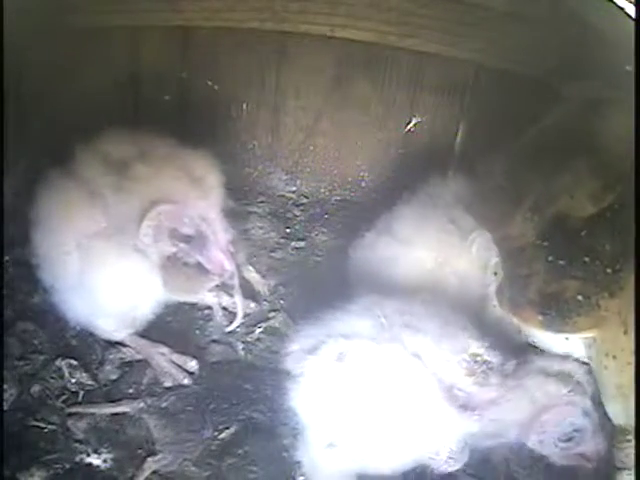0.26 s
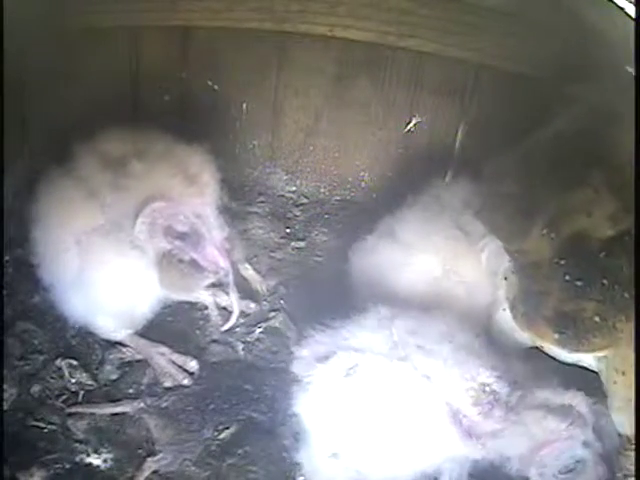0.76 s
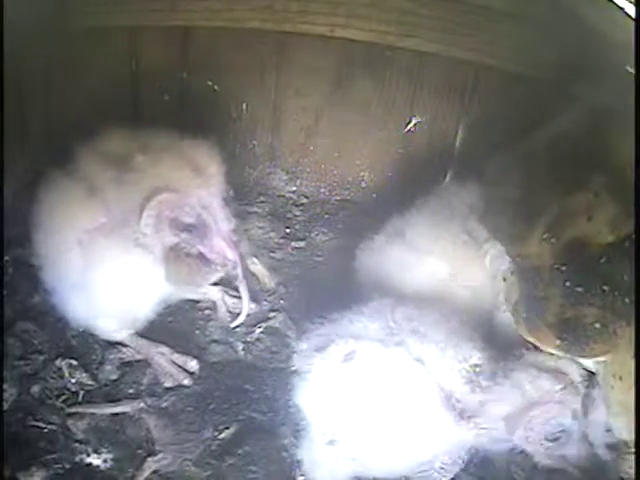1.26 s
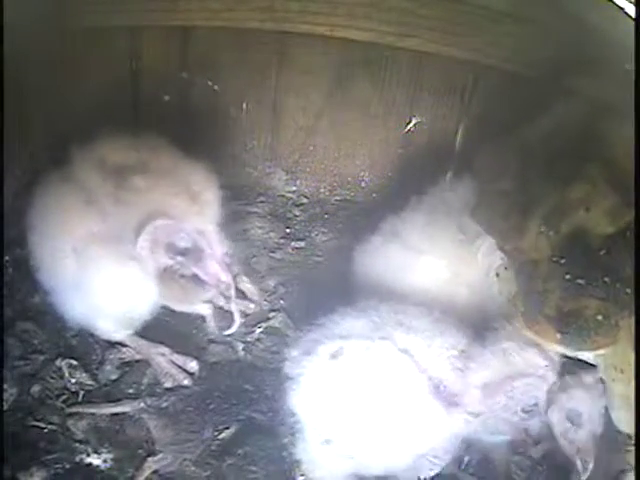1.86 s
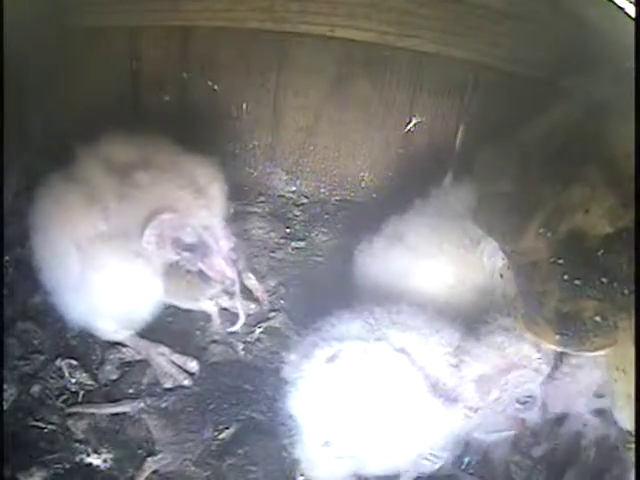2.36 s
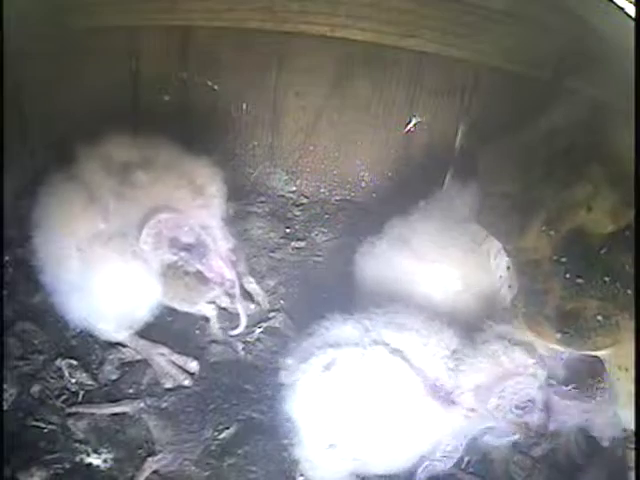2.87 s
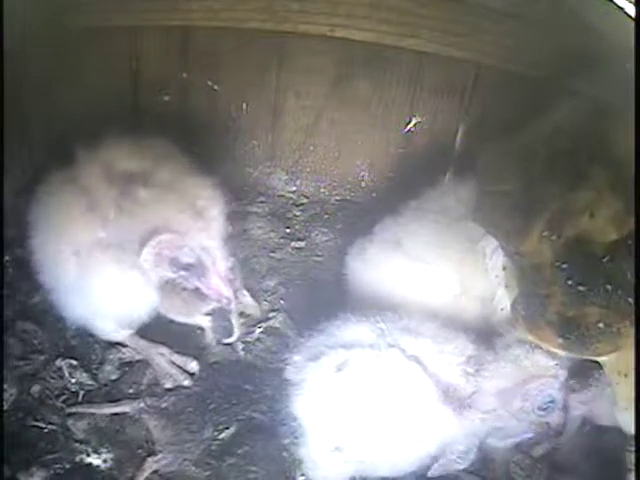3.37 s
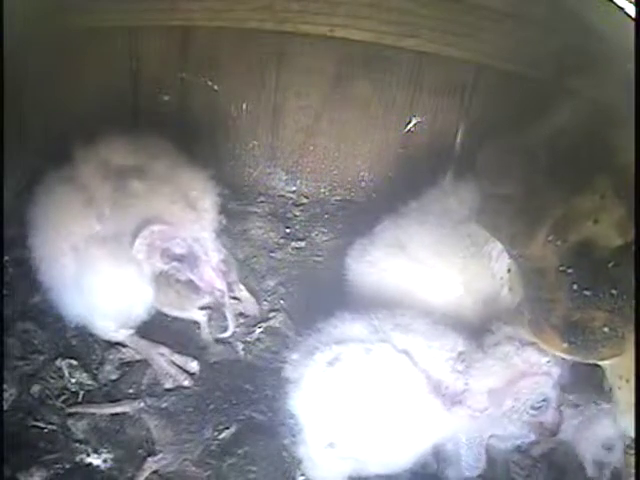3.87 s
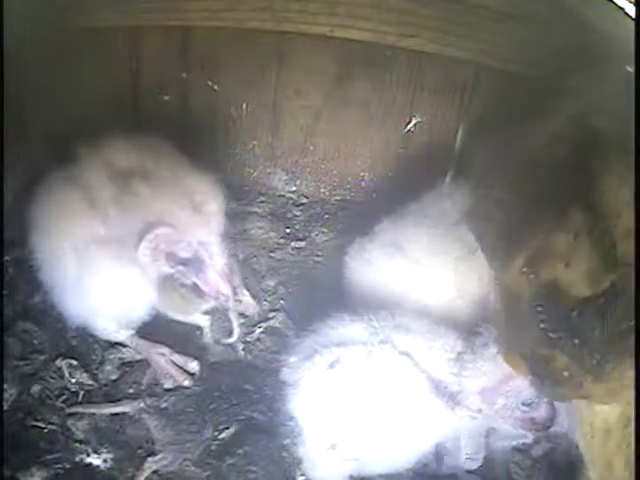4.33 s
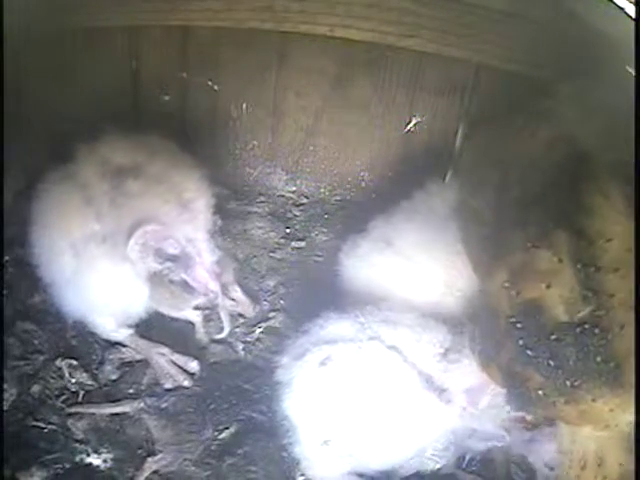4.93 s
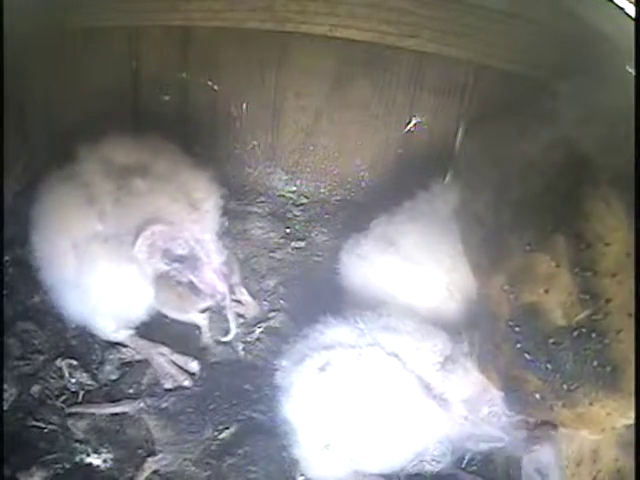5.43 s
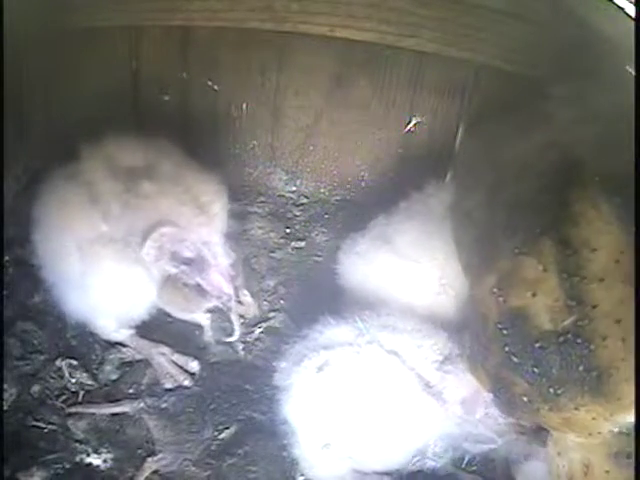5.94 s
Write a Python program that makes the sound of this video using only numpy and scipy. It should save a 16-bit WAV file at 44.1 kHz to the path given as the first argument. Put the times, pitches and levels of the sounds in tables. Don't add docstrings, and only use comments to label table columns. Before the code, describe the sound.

Close and dry, a barn owl chick repeats hoarse snore-like hisses that swell, then choke off abruptly with a short chirp. Little clicks and thin squeaks come between them. Soft footsteps and one firm thud sound on wood before the halfway point. Beneath lie mains-like buzzing, line hiss, a faint wavering distant machine and dull traffic. The gritty sound sits on the left, the right almost silent; the final hiss is cut short.

```python
import sys
import numpy as np
from scipy import signal
from scipy.fft import rfft, irfft, next_fast_len
from scipy.io import wavfile
from scipy.ndimage import uniform_filter1d, map_coordinates

SR = 44100
rng = np.random.default_rng(int(sys.argv[2]) if len(sys.argv) > 2 else 0)


def digitize_waveform(pressure):
    field = np.atleast_2d(pressure).T
    bounded = np.clip(field, -1, 1)
    quanta = np.round(bounded * 32767).astype(np.int16)
    wavfile.write(sys.argv[1], SR, quanta)


def volts_from_decibels(level):
    exponent = np.asarray(level, float) / 20
    return 10 ** exponent


N = 273420
T = np.arange(N) / SR
FIELD_HZ = 59.94

# (centre [Hz], width [Hz], level [dB])
TRACT_MODES = [(1360, 76, -7), (1960, 220, -6.5), (2530, 160, -10.5), (4080, 78, -10), (4396, 200, -3),
               (4562, 140, 2.5), (5000, 66, -13.5), (5970, 100, -12), (6615, 140, -6), (7124, 77, -6),
               (8130, 160, -9.5), (8980, 160, -15.5), (9950, 190, -8), (12000, 110, -25)]


def along(points, hz):
    f, v = np.transpose(points)
    return np.interp(np.log(hz + 1), np.log(f + 1), v)


def unit(x):
    return x / np.sqrt(np.mean(x ** 2, axis=-1, keepdims=True) + 1e-20)


def wobble(rate, n):
    knots = rng.standard_normal(int(n * rate / SR) + 4)
    return map_coordinates(knots, [np.arange(n) * rate / SR])


def filtered(x, response):
    m = next_fast_len(x.shape[-1] + 8192)
    spectrum = rfft(x, m) * response(np.fft.rfftfreq(m, 1 / SR))
    return irfft(spectrum, m)[..., :x.shape[-1]]


def noise(spectrum, n):
    return unit(filtered(rng.standard_normal(n), lambda hz: volts_from_decibels(along(spectrum, hz))))


def add(track, s, x):
    part = track[round(s * SR):][:len(x)]
    part += x[:len(part)]


def resonances(modes, f, home=None):
    total = 0
    for (centre, width, db), home_mode in zip(modes, home or modes):
        sign = (-1) ** (home_mode[0] // 2200)
        ring = 1j * f * width
        total = total + sign * volts_from_decibels(db) * ring / (centre * centre - f * f + ring)
    return total


def valleys(dips, f):
    return volts_from_decibels(sum(db * np.exp(-((f - c) / w) ** 2) for c, w, db in dips))


def owlet():
    # (time [s], level [dB])
    efforts = [
        [(0.297, -59), (0.305, -57), (0.351, -36.5), (0.467, -24), (0.699, -24), (0.731, -36.5), (0.765, -57)],
        [(1.126, -57.5), (1.164, -42.5), (1.248, -32.5), (1.418, -23), (1.496, -21.5), (1.55, -36),
         (1.565, -72)],
        [(1.948, -55.5), (1.996, -38), (2.186, -23), (2.326, -24.5), (2.374, -37), (2.394, -48), (2.4, -74)],
        [(2.722, -39), (2.734, -43), (2.958, -21.5), (3.09, -20.5), (3.162, -30), (3.212, -44.5),
         (3.225, -57.5)],
        [(3.578, -67.5), (3.652, -35.5), (3.76, -30.5), (3.816, -28), (3.83, -25.5), (3.914, -27), (3.985, -66)],
        [(4.44, -100), (4.47, -71), (4.48, -60), (4.71, -26), (4.832, -31), (4.88, -46), (4.89, -89)],
        [(5.242, -80.5), (5.288, -50.5), (5.354, -40), (5.434, -31), (5.6, -28.5), (5.642, -50.5), (5.65, -95)],
        [(6.05, -50), (6.054, -57.5), (6.084, -47), (6.192, -37.5), (6.2, -38)],
    ]
    # (chest [dB], throat [dB], bill [dB], air [dB])
    region_levels = [(-14, -10, -13, -10), (-14.5, -7.5, -9, -10.5), (-12.5, -5, -9.5, -9),
                     (-15, -16.5, -6.5, -21.5), (-12, -8, -10, -8), (-10, -6, -8, -10.5),
                     (-7.5, -3.5, 0, -4), (-1, -1.5, 2.5, -6)]
    throat_growth = [0.95, 1, 0.78, 0.57, 0.75, 0.55, 0.38, 0.85]
    shut_times = [0.023, 0.036, 0.05, 0.027, 0.028, 0.037, 0.033, .03]
    # (centre [Hz], width [Hz], level [dB])
    postures = [
        [(1324, 61, -14.5), (3350, 46, -3), (4020, 58, -8.5), (6270, 79, -12), (7920, 170, -9)],
        [(1090, 140, -8), (2650, 394, -23.5), (3130, 22, -4), (6790, 240, -12), (9560, 180, -8.5)],
        [(1810, 160, 3.5), (2460, 200, 3), (2935, 39, -2.5), (3950, 100, -10.5), (4740, 296, -8.5)],
        [(1650, 200, 1.5), (3762, 350, -3.5), (4614, 100, 7), (5220, 34, -29), (6500, 33, -5)],
        [(1090, 140, -11), (2520, 55, -2.5), (4860, 55, -3.5), (5160, 130, -1), (6860, 320, -5.5)],
        [(657, 94, -4.5), (1800, 280, -10), (2550, 310, -9), (6500, 140, -12), (10240, 180, -12)],
        [(1320, 46, -16), (2340, 280, -5.5), (4310, 860, -3.5), (6000, 95, -15), (6500, 100, 1)],
        [(1420, 73, -6), (2730, 23, -4), (6430, 120, 3.5), (7000, 68, -8), (10100, 460, 4)],
    ]
    # (centre [Hz],
    # width [Hz], gain [dB])
    echo_valleys = [
        [(3220, 260, -2.5), (5500, 100, -6), (8600, 200, -9)],
        [(3200, 400, -3), (6220, 120, -8), (8650, 370, -13)],
        [(3930, 130, 6), (5740, 150, 6), (10810, 250, -14)],
        [(3175, 300, -13.5), (5540, 450, -8.5), (7430, 340, -12.5)],
        [(5540, 430, -9), (7660, 200, 4.5), (9000, 160, 4)],
        [(3280, 300, -8), (5000, 120, -5), (7670, 480, -6.5)],
        [(3310, 340, -10), (5300, 400, -8), (5880, 130, -11)],
        [(3590, 500, -5.5), (7700, 250, -12), (8800, 200, -1)],
    ]
    # (centre [Hz], width [Hz], start level [dB], end level [dB])
    head_turns = [
        [(2800, 500, -3, 5.5), (4200, 150, -1.5, -5.5), (5250, 150, -3.5, 6), (6500, 300, -6, 2),
         (9950, 200, -9, -5), (5000, 200, 5, 5)],
        [(4150, 170, -6, -1), (5120, 290, 10.5, -7.5), (5830, 230, 6, -9.5), (9200, 200, 1, 2.5),
         (11000, 500, -5, 3), (4550, 200, -3, 5), (6700, 400, 3, -5), (2100, 400, -5, 3)],
        [(3300, 200, -0.5, -1), (4200, 120, 4, 4), (4520, 120, -5, -3), (5620, 430, 5, -4), (7300, 430, 0.5, 4),
         (10280, 400, 3.5, 4.5)],
        [(3200, 200, -3, -9), (5600, 250, 5, 3.5), (7600, 250, -1.5, 7), (9950, 200, -8, -7),
         (8200, 400, -2, -1), (11500, 500, 6.5, -2)],
        [(1500, 180, 0, -10), (2600, 300, -8, 5), (4230, 250, 5, -4), (5640, 230, 8, -10), (8800, 270, -9, -6),
         (10800, 400, -6, -1)],
        [(4300, 180, -3, 6), (3000, 400, 2, 5.5), (5300, 300, 5, 5), (5700, 150, 8, 6), (7200, 210, -15, -1),
         (10600, 400, 0, -3)],
        [(1600, 120, -9, -6), (4150, 250, 3, 6), (3300, 330, -3, 3), (5600, 450, -1, 4.5), (6650, 250, 4, 6),
         (9700, 350, -9, -1)],
        [(1400, 170, 0, -2), (3200, 500, -1, 3), (5400, 300, 11, 5), (7150, 200, 2, -9), (8600, 300, 1, -4),
         (4800, 200, 5, 3)],
    ]
    # (peep start [s], peep end [s], first pitch [Hz], peep level [dB], narrowing level [dB])
    endings = [(0.748, 0.768, 2050, -31.5, -31.5), (1.554, 1.566, 1800, -36, -31),
               (2.379, 2.403, 2000, -31.5, -37), (3.207, 3.223, 1860, -31, -38.5),
               (3.964, 3.99, 2036, -31, -29.5), (4.87, 4.89, 2007, -31, -32.5),
               (5.637, 5.646, 2105, -25.5, -30)]
    peep_overtones = [-26, -25, -20, -45, -30, -45, -45]
    # (start [s], end [s], level [dB])
    leaks = [
        (.268, 0.297, -65),
        (4.436, 4.471, -53),
        (6.015, 6.054, -53.5),
    ]
    # (time [s], length [s], depth [dB])
    catches = [(0.7415, .002, -18), (0.76, 0.007, -15), (1.53, .0015, -15), (1.5425, 0.002, -18),
               (1.558, 0.005, -24), (2.378, 0.0018, -19), (2.396, .007, -12), (4.835, .002, -15),
               (4.859, 0.0028, -26), (5.631, 0.0015, -15), (5.6365, .001, -8), (6.058, 0.0032, -5)]
    # (start [s], end [s], first pitch [Hz], level [dB], overtones [dB])
    whistles = [(0.287, 0.298, 4800, -47, -21), (1.114, 1.127, 4750, -53, -22),
                (1.933, 1.947, 5150, -54, -12), (3.564, 3.578, 4520, -46.5, -33),
                (5.223, 5.244, 5170, -57, -12), (6.04, 6.049, 4840, -42, -12)]
    # (start [s], end [s], pitch [Hz], level [dB], overtones [dB])
    squeaks = [(0.269, 0.276, 5400, -60, -20), (0.287, .292, 7000, -58, -30),
               (4.436, 4.444, 5000, -58.5, -15), (4.442, 4.456, 6500, -47, -30),
               (4.458, 4.467, 6850, -47, -30), (4.462, 4.474, 4500, -38, -16),
               (4.839, 4.851, 4250, -37, -40), (6.016, 6.021, 4950, -62, -6)]
    # (time [s], peak level [dB], pitch [Hz], crack level [dB])
    pops = [(0.2969, -40.5, 1360, -5.5), (1.061, -49, 1500, -12), (1.1286, -40, 1330, -11.5),
            (1.774, -44, 1120, -28), (1.949, -34.5, 1800, -10), (2.7226, -32.5, 2100, -5),
            (3.4251, -35.5, 2040, -13), (3.579, -37.5, 2100, -7), (4.467, -42, 1420, -3),
            (5.242, -35, 2050, -22), (6.047, -39, 1960, -9)]
    narrow_s, whistle_end_hz, pop_t60_s = 0.085, 4180, 0.01

    breath, notes = np.zeros(N), np.zeros(N)
    for rows, regions_db, grows, shut_s, extra, dips, turn in zip(
            efforts, region_levels, throat_growth, shut_times, postures, echo_valleys, head_turns):
        voice = hiss(rows, regions_db, grows, shut_s, TRACT_MODES + extra, dips, turn,
                     spill_db=-5.5, flutter_db=0.8)
        add(breath, rows[0][0], voice)
    for (start, end, hz, db, narrow_db), over_db in zip(endings, peep_overtones):
        add(breath, start - narrow_s, closing(narrow_s, 2500, 1.03 * hz, narrow_db, width_hz=380))
        add(notes, start, peep(end - start, hz, 0.82 * hz, db, over_db))
    for start, end, db in leaks:
        add(breath, start, leak(end - start, db))
    breath *= volts_from_decibels(sum(db * np.exp(-((T - s) / length) ** 2) for s, length, db in catches))

    for start, end, hz, db, over_db in whistles:
        add(notes, start, peep(end - start, hz, whistle_end_hz, db, over_db))
    for start, end, hz, db, over_db in squeaks:
        add(notes, start, peep(end - start, hz, hz, db, over_db))
    t = T[:SR // 20]
    for s, db, hz, crack_db in pops:
        crack = volts_from_decibels(crack_db) * np.diff(rng.standard_normal(len(t) + 1))
        decay = volts_from_decibels(db + 4.5 - 60 * t / pop_t60_s)
        add(notes, s, decay * (np.sin(2 * np.pi * hz * t) + 0.26 * crack))
    return breath + notes


def hiss(rows, regions_db, throat_grows, shut_s, modes, dips, turn, spill_db, flutter_db):
    # (frequency [Hz], level [dB])
    spill_spectrum = [(180, -64), (300, -11), (915, -7), (1060, -4), (1510, -9.5), (1900, -8), (3640, -9.5),
                      (4520, -18), (5610, -46), (6850, -12.5), (10000, -18), (13300, -15.5), (16000, -33.5)]
    # (centre [Hz], width [Hz], level [dB])
    wall_valleys = [(341, 124, -10.5), (882, 89, -8.5), (1585, 89, -3.5), (2180, 76, -5.5),
                    (4870, 110, -0.5), (4800, 77, 4.5)]
    borders_hz = [1650, 3300, 5500, 7600]
    # chest, bill, air [dB/dB]
    growth = (0.29, 0.52, 0.63)
    # chest, throat, bill, air [dB]
    shut_levels = (-0.5, 2, -24, -26.5)
    # time [s], length [s], depth [dB]
    half_shut = (4.752, .026, -13)
    # chest, throat, bill, air [dB]
    open_levels, open_s = (-5.5, 6, -26, -14), 0.018

    s, effort_db = np.transpose(rows)
    n = round((s[-1] - s[0]) * SR)
    t = s[0] + np.arange(n) / SR
    flow = volts_from_decibels(flutter_db * wobble(45, n) + 0.3 * wobble(220, n))
    air = unit(drifting(flow * rng.standard_normal(n), modes))
    air = air + volts_from_decibels(spill_db) * flow * noise(spill_spectrum, n)
    air = patches(air, depth_db=1.4)
    air = filtered(air, lambda f: valleys(dips + wall_valleys, f) / (1 + (f / 13500) ** 5))

    before = [(c, w, db) for c, w, db, _ in turn]
    after = [(c, w, db) for c, w, _, db in turn]
    first = filtered(air, lambda f: valleys(before, f))
    last = filtered(air, lambda f: valleys(after, f))
    air = first + np.linspace(0, 1, n) * (last - first)

    cuts_hz = np.array([1, *borders_hz, SR * 9])[:, None]

    def split(f):
        above = 1 / (1 + (cuts_hz / (f + 1)) ** 16)
        return np.sqrt(np.abs(np.diff(above, axis=0)))

    chest, throat, pipe, bill, top = unit(filtered(air, split))

    pipe_db, full_db = np.interp(t, s, effort_db), effort_db.max()
    opening = np.exp((s[0] - t) / open_s)
    shutting = np.exp((t - s[-1]) / shut_s) * (s[-1] < T[-SR // 10])
    follow_db = []
    for db, grows, open_db, shut_db in zip(
            regions_db, np.insert(growth, 1, throat_grows), open_levels, shut_levels):
        swell = full_db + db + grows * (pipe_db - full_db)
        follow_db.append(swell + open_db * opening + shut_db * shutting)
    gape_s, gape_length_s, gape_db = half_shut
    gape = volts_from_decibels(gape_db * np.exp(-((t - gape_s) / gape_length_s) ** 2))
    edge = np.clip(np.minimum(t - s[0], s[-1] - t) / 0.0012, 0, 1)
    others = np.sum(volts_from_decibels(follow_db) * [chest, throat, gape * bill, gape * top], 0)
    return edge * (volts_from_decibels(pipe_db) * pipe + others)


def drifting(air, modes):
    move = rng.standard_normal((len(modes), 2)) * [0.015, 2]

    def shaped(way):
        shape = []
        for (c, w, db), (shift, gain_db) in zip(modes, move):
            moves = abs(c - 4600) > 100
            shape.append((c * (1 + way * shift * moves), w, db + way * gain_db))
        return filtered(air, lambda f: resonances(shape, f, modes) / (1 + (500 / (f + 1)) ** 3))

    u = np.linspace(0, 1, len(air))
    return (1 - u) * shaped(-1) + u * shaped(1)


def patches(x, depth_db):
    z = signal.stft(x, nperseg=256)[2]
    field = uniform_filter1d(rng.standard_normal(z.shape), 2, 0)
    field = uniform_filter1d(field, 24, 1)
    return signal.istft(z * volts_from_decibels(depth_db * field / np.std(field)), nperseg=256)[1][:len(x)]


def closing(length, hz0, hz1, db, width_hz):
    u = np.arange(round(length * SR)) / (length * SR)
    turn = 2 * np.pi * np.cumsum(hz0 + (hz1 - hz0) * u ** 3.68) / SR
    sway = wobble(1.6 * width_hz, len(u)) * np.sin(turn) + wobble(1.6 * width_hz, len(u)) * np.cos(turn)
    return volts_from_decibels(db - 1.5) * np.sin(np.pi * u ** 1.8) ** 0.5 * sway


def peep(length, hz0, hz1, db, over_db):
    u = np.arange(round(length * SR)) / (length * SR)
    turn = 2 * np.pi * np.cumsum(hz0 + (hz1 - hz0) * u ** 1.5) / SR
    tone = np.sin(turn)
    for k in range(3):
        if (k + 2) * hz0 < 11000:
            tone = tone + volts_from_decibels(over_db - 3 * k + rng.normal(0, 2.5)) * np.sin((k + 2) * turn)
    return volts_from_decibels(db + 1.0 + 2.5 * wobble(350, len(u))) * np.sin(np.pi * u) ** 0.64 * tone


def leak(length, db):
    n = round(length * SR)
    air = filtered(rng.standard_normal(n),
                   lambda f: resonances(TRACT_MODES, f) / (1 + (5000 / (f + 1)) ** 4))
    return volts_from_decibels(db + 5 * wobble(250, n)) * np.hanning(n) ** 0.7 * unit(air)


def feet():
    # (time [s], peak level [dB], pitch [Hz], t60 [s])
    knocks = [
        (1.499, -40.5, 370, 0.034),
        (1.799, -51, 199, 0.044),
        (2.188, -47, 257, 0.025),
        (2.669, -52.5, 171, 0.049),
        (2.911, -21.5, 179, 0.026),
        (2.936, -43, 200, .04),
        (3.015, -48, 190, .04),
        (3.329, -54, 178, 0.053),
    ]
    # (start [s], end [s], level [dB])
    shuffles = [
        (3.324, 3.368, -55.5),
    ]
    litter_modes = [(500, 500, 8), (2320, 840, 5.5), (4500, 540, 2), (6700, 500, 1.5)]  # Hz, width Hz, dB
    out, t = np.zeros(N), T[:SR // 8]
    soft_start = (1 - np.exp(-t / 0.0068)) ** 2
    for s, db, hz, t60 in knocks:
        board = np.sin(2 * np.pi * 1.055 * hz * t) + 0.25 * np.sin(2 * np.pi * 1.9 * hz * t)
        add(out, s, -volts_from_decibels(db + 20.0 - 60 * t / t60) * soft_start * board)
    for start, end, db in shuffles:
        n = round((end - start) * SR)
        scrape = unit(filtered(rng.standard_normal(n), lambda f: resonances(litter_modes, f)))
        add(out, start, volts_from_decibels(db + 3.3 * wobble(143, n)) * np.hanning(n) ** 0.45 * scrape)
    return out


def box(x):
    t = T[:SR // 12]
    tail = rng.standard_normal(len(t)) * volts_from_decibels(-60 * t / 0.03) * (t > 0.0012)
    return x + volts_from_decibels(-17) * signal.fftconvolve(x, tail / np.linalg.norm(tail))[:N]


def buzz():
    # (time [s], blanking dip [dB], bright area [dB],
    # end of bright area [0-1 of a field], hiss [dB])
    picture = [(0, -42, -37.5, 0.38, -55), (.8, -38, -41.5, 0.49, -56), (2.5, -35.5, -47, 0.64, -56),
               (4.201, -36, -49, 0.6, -57), (6.2, -35, -77, 0.96, -56.5)]
    # (frequency [Hz], level [dB])
    floor_spectrum = [(190, -21.5), (330, -1.5), (459, -1.5), (959, -1), (1230, -4), (1370, -2.5),
                      (1490, -3.5), (1910, -4.5), (3750, -21.5), (4390, -22.5), (7360, -26.5),
                      (8090, -30.5), (11800, -26.5), (14000, -47)]
    # (centre [Hz], width [Hz], level [dB])
    hollow_modes = [(2505, 150, -7), (2920, 99.3, -5), (4500, 130, 8.5), (6425, 130, 7)]
    scan_hz, field_start_s = 15734.3, 0.00944
    s, *cols = np.transpose(picture)
    dip_db, bright_db, bright_end, hiss_db = [np.interp(T, s, c) for c in cols]
    u = (FIELD_HZ * (T - field_start_s) + 0.1) % 1 - 0.1

    def step(at, soft):
        return 0.5 + 0.5 * np.tanh((u - at) / soft)

    blank = step(0.0013, 0.041) - step(0.13, 0.019)
    bright = step(0.145, 0.012) - step(bright_end, 0.13)
    tick = volts_from_decibels(-50.0) * np.exp(-((u + 0.0847) / 0.0063) ** 2)
    for at, db in [(-0.048, -43), (0.013, -53), (0.137, -48)]:
        tick = tick - volts_from_decibels(db) * np.exp(-((u - at) / 0.0016) ** 2)
    field = volts_from_decibels(bright_db) * bright - volts_from_decibels(dip_db) * blank - tick

    half_scan = volts_from_decibels(-79.5) * (1 - step(-0.05, 0.011) + step(0.14, 0.01)) * np.sin(np.pi * scan_hz * T)
    sideband_spectrum = [(13800, -56.5), (14000, -15.0), (15300, -17.0),
                         (15600, -12), (15750, -1.5), (15950, -8.5)]
    whistle = np.sin(2 * np.pi * scan_hz * T) + 0.9 * noise(sideband_spectrum, N)
    scan = volts_from_decibels(-55.5 + 3.5 * wobble(43, N)) * whistle
    line_hiss = filtered(noise(floor_spectrum, N), lambda f: valleys(hollow_modes, f))
    line_hiss = volts_from_decibels(hiss_db + 0.23 * wobble(5.4, N)) * line_hiss
    return field - np.mean(field) + half_scan + scan + line_hiss


def drone():
    # (time [s], pitch [Hz], level [dB])
    whine = [(0, 1135, -61.5), (.3, 1090, -64), (.8, 1042, -61.5), (1.1, 1090, -64), (1.7, 1086, -65.5),
             (2.6, 990, -65.5), (3.33, 1030, -65), (3.5, 979, -67), (4.0, 978, -63.5), (4.2, 945, -62),
             (4.45, 1007, -62), (4.9, 1011, -63.5), (5.2, 984, -62), (5.75, 1002, -64.5), (6.2, 1062, -65)]
    # (ratio [times the pitch], level [dB])
    whine_lines = [(.68, -6), (.86, -4.5), (1, 1.5), (1.12, -4.5), (1.41, -5.5)]
    s, hz, db = np.transpose(whine)
    total = 0
    for ratio, part_db in whine_lines:
        level = volts_from_decibels(np.interp(T, s, db) + part_db + 2.5 * wobble(6, N))
        pitch = np.interp(T, s, hz) * (1 + 0.005 * wobble(5, N))
        total = total + level * np.sin(ratio * 2 * np.pi * np.cumsum(pitch) / SR)
    return total


def dropouts(x, soft_db, loud_db):
    # (frequency [Hz], share [0-1])
    kept_share = [(12100, 1), (12600, .75), (13100, .42), (14200, .4), (14900, .65), (15400, .88),
                  (15600, 1.1)]
    hz, t, z = signal.stft(x, SR, nperseg=1024)
    treble_power = np.sum(np.abs(z[(hz > 7600) & (hz < 12000)]) ** 2, 0)
    treble = np.sqrt(uniform_filter1d(treble_power, size=2))
    band, block = (hz // 345).astype(int), np.arange(len(t)) // 2

    luck = rng.random((band[-1] + 1, len(t)))
    spread = uniform_filter1d(luck + 0.5 * luck[0], 3, 0)
    spread = uniform_filter1d(spread, 5, 1) + 0.2 * luck
    rank = np.argsort(np.argsort(spread, axis=1), axis=1) / len(t)

    quiet_top_hz = 13500 - 700 * (luck[1, block] < 0.2)
    top_hz = np.where(treble > volts_from_decibels(soft_db), 15150, quiet_top_hz)
    lucky = rank[band][:, block] < along(kept_share, 345 * band + 172)[:, None]
    kept = np.where(treble > volts_from_decibels(loud_db), lucky, hz[:, None] < top_hz)
    return signal.istft(z * kept, SR, nperseg=1024)[1][:N]


def scene():
    # (frequency [Hz], level [dB])
    line_response = [(11500, 2.5), (12400, -0.5), (12700, -4.5), (14300, 0.5), (15600, -7)]
    # (frequency [Hz], level [dB])
    rumble_spectrum = [(15, -14.5), (30, 3), (70, -0.5), (120, 2), (170, 0), (330, -17.5), (500, -51)]
    # (frequency [Hz], level [dB])
    idle_spectrum = [(20, -15), (120, -9), (300, -3.5), (600, -21), (1200, -32), (9000, -35.5),
                     (11000, -47)]
    air = box(owlet() + feet())
    air = air + 0.1 * filtered(air ** 2, lambda f: 1 / (1 + (600 / (f + 1)) ** 4))
    air = filtered(air, lambda f: volts_from_decibels(along(line_response, f)))
    air = air + drone() + volts_from_decibels(-57) * noise(rumble_spectrum, N)
    hum = volts_from_decibels(-79.0) * np.sin(2 * np.pi * FIELD_HZ * T + 0.9)
    idle = hum + volts_from_decibels(-76.2) * air + volts_from_decibels(-84.5) * noise(idle_spectrum, N)
    return np.array([air + buzz(), idle])


def band_limit(x):
    return signal.sosfilt(signal.butter(12, 17160, fs=SR, output="sos"), x)


def record(dry):
    line = filtered(dry, lambda f: 1j * f / (12 + 1j * f) * (f < 15830))
    mix = np.array([dropouts(line[0], soft_db=-57, loud_db=-47), line[1]])
    return band_limit(mix)


dry = scene()
out = record(dry)
digitize_waveform(out)
```